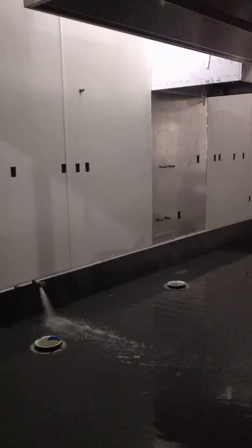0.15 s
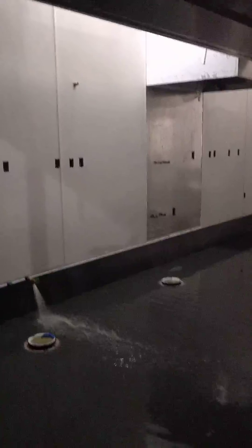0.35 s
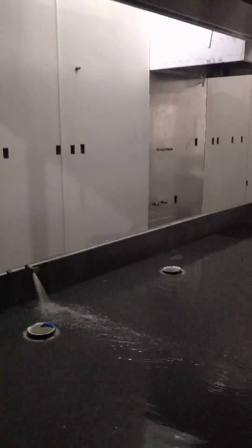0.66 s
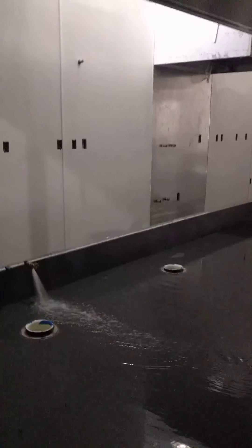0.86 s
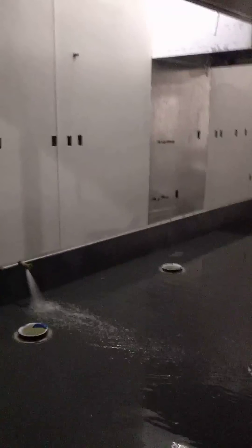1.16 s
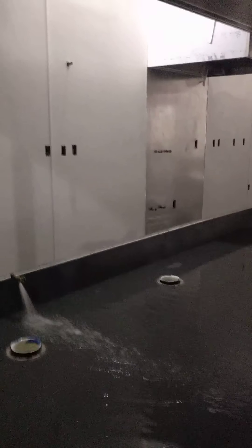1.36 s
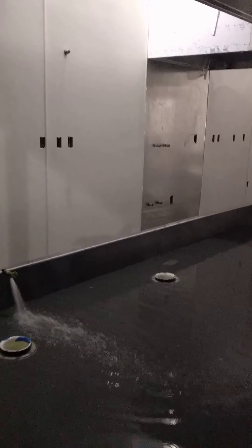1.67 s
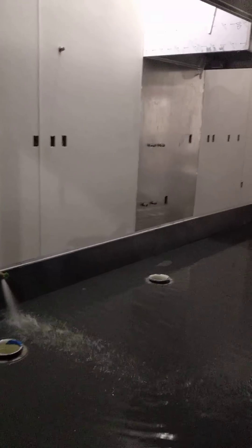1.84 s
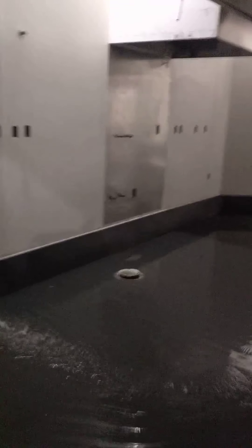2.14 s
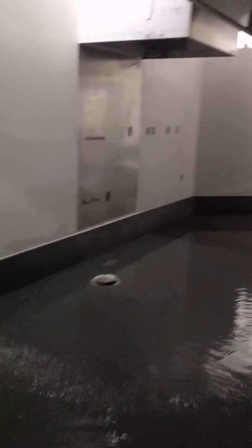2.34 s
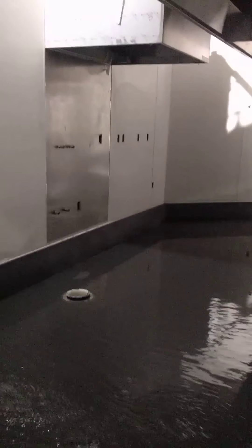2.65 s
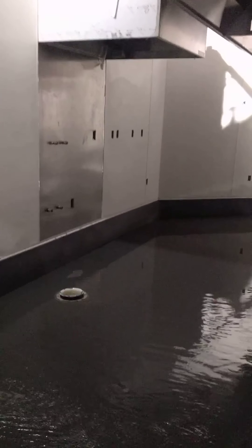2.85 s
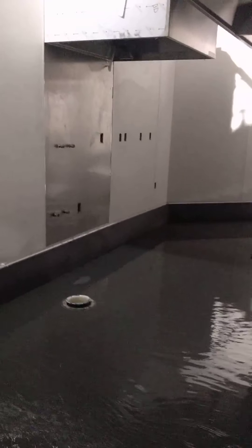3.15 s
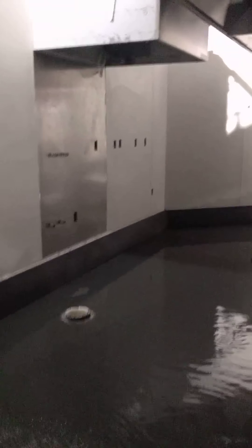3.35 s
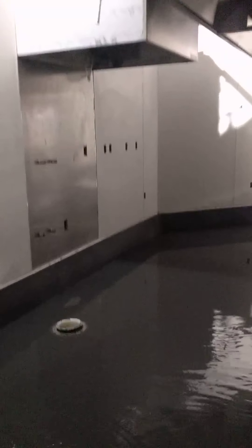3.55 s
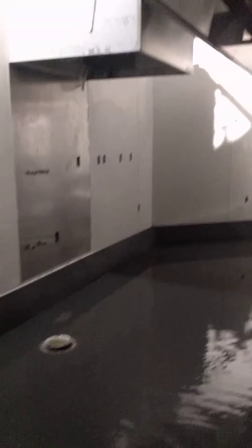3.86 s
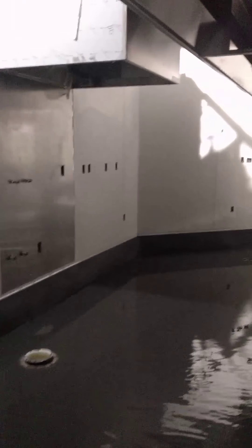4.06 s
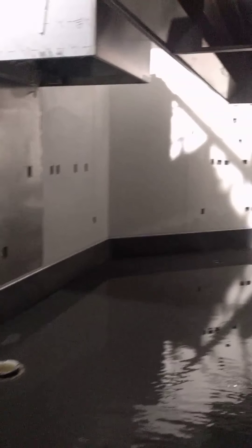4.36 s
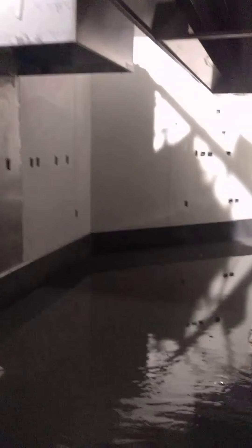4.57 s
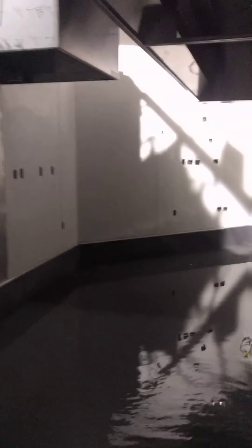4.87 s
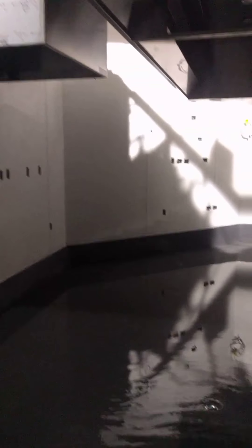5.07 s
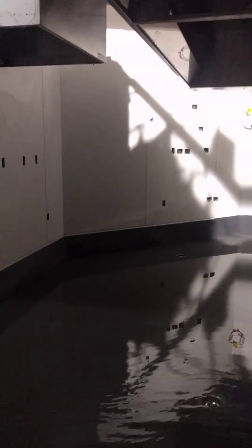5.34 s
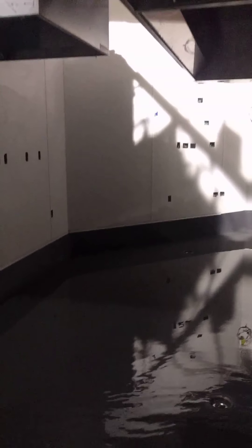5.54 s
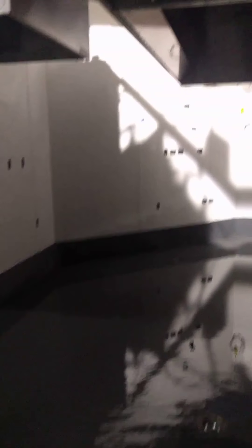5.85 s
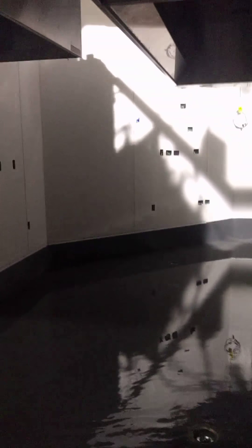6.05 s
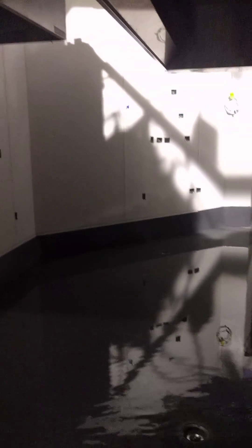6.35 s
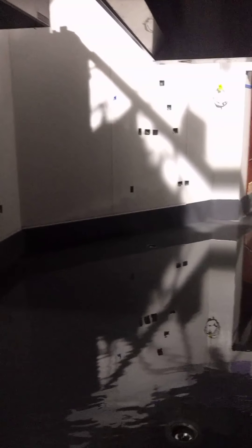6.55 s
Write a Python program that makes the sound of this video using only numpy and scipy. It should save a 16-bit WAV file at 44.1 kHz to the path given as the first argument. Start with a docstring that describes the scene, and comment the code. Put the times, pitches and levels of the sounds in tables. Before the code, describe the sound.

A continuous high hiss with a slight ring comes from a pipe spraying water onto a flooded kitchen floor. Beneath it are bubbling, sizzling droplets, a soft rumble where the jet lands and the low drone of the hard-walled room. Brief, light gulps pop up here and there. The microphone swings slowly away towards the far corner, so the spray gets brighter and the rumble fades, while the flow never stops.

```python
"""A bright, steady hiss: water jets from a pipe at the foot of a wall in a large, bare, flooded kitchen.
The nozzle rushes and rings, spray patters down, and the jet rumbles into the pool and churns up bubbles.
A few air pockets gulp. Hard walls blur the water, and the room drones low underneath.
The microphone swings slowly towards the far, steel-clad corner: the treble grows, the rumble recedes."""
import sys
import numpy as np
from scipy import signal
from scipy.fft import rfft, irfft
from scipy.io import wavfile
from scipy.ndimage import map_coordinates

SR = 44100
rng = np.random.default_rng(int(sys.argv[2]) if len(sys.argv) > 2 else 0)


def generate_wav(signal):
    """Clip the signal to [-1, 1] and save it as 16-bit WAV at the path in sys.argv[1]."""
    frames = np.transpose(np.atleast_2d(signal))
    scaled = np.clip(frames, -1, 1) * 32767
    pcm = np.round(scaled).astype(np.int16)
    wavfile.write(sys.argv[1], SR, pcm)


N = 295911


def undb(db):
    """Decibels to gain."""
    return 10 ** (np.asarray(db) / 20)


def unit(x):
    """Scale to rms 1."""
    return x / np.sqrt(np.mean(x ** 2))


def colour(x, spectrum):
    """Shape a sound by rows of (frequency_hz, relative_db), then scale it to rms 1."""
    hz, db = np.transpose(spectrum)
    bins_hz = np.maximum(np.fft.rfftfreq(2 * N, 1 / SR), 1)
    gain = undb(np.interp(np.log(bins_hz), np.log(hz), db))
    return unit(irfft(rfft(x, 2 * N) * gain)[:N])


def resonate(x, hz, width_hz):
    """One resonance, gain 1 at its centre."""
    return signal.lfilter(*signal.iirpeak(hz, hz / width_hz, fs=SR), x)


def wander(rate_hz):
    """A random drift of rms 1 that changes course about rate_hz times a second."""
    knots = rng.standard_normal(8192)
    return unit(map_coordinates(knots, [np.arange(N) / SR * rate_hz], order=1, mode="wrap"))


def impacts(count, spread_db):
    """Droplets click at random moments, many small and a few large."""
    when, chance, sign = rng.random((count, 3)).T
    size = undb(-spread_db * np.log(np.maximum(chance, .002)))
    return unit(np.bincount((when * N).astype(int), size * np.sign(sign - .5), N))


def bubble(hz, cycles, glide):
    """A trapped air bubble rings, fading to 1/e over cycles, and rises in pitch as it nears the surface."""
    age = np.arange(int(5 * cycles * SR / hz)) * hz / (SR * cycles)
    return np.exp(-age) * np.sin(2 * np.pi * cycles * age * (1 + glide * age / 2))


def add(out, at_s, sound):
    """Mix a short sound in at a given time."""
    start = int(np.clip(at_s * SR, 0, N - 1))
    out[start:start + len(sound)] += sound[:N - start]


def echoes(x, wet_db, t60_low_s, t60_high_s, changes):
    """Direct sound plus a dense echo whose pattern changes as microphone and water move."""
    t = np.arange(int(min(t60_low_s, 1) * SR * .7)) / SR
    low_decay, high_decay = (np.exp(-np.log(1000) * t / t60) for t60 in (t60_low_s, t60_high_s))
    lowpass = signal.butter(1, 3000, fs=SR)
    hop = N // changes + 1
    echo = np.zeros(N)
    for centre in range(0, N + hop, hop):
        span = np.arange(max(centre - hop, 0), min(centre + hop, N))
        piece = x[span] * np.cos(np.pi / 2 * (span - centre) / hop)
        noise = rng.standard_normal(len(t))
        low = signal.lfilter(*lowpass, noise)
        tail = (low * low_decay + (noise - low) * high_decay) * (t > .001)  # lags the direct sound
        add(echo, span[0] / SR, signal.fftconvolve(piece, tail / np.linalg.norm(tail)))
    wet = undb(wet_db)
    return (x + wet * echo) / np.hypot(1, wet)


def kitchen(x, wet_db):
    """The long echo of hard, bare walls; its treble dies first."""
    return echoes(x, wet_db, t60_low_s=0.82, t60_high_s=0.43, changes=14)


# The microphone's swing towards the far corner: time_s, share_of_turn (0 to 1)
MIC_TURN = [(0, 0.01), (1.9, 0.28), (2.6, 0.3), (3.2, 0.54), (5.0, 0.88), (6.71, 1)]
def mic_turn():
    """How far round the microphone has swung at each sample."""
    return np.interp(np.arange(N) / SR, *np.transpose(MIC_TURN))


def pickup(level_db, turn_db):
    """Gain of a source at the microphone: level_db, changing by turn_db over the whole turn."""
    return undb(level_db + turn_db * mic_turn())


# The air of the kitchen, all around the microphone: frequency_hz, relative_db
ROOM_SPECTRUM = [(15, -22), (32, -18), (47, 1), (62, 5), (90, -5), (130, -8), (180, -0.5), (240, -3),
                 (430, -6), (600, -17), (1200, -19.5)]
def room_tone():
    """The room drones low; the hollow ring of its steel-clad corner grows as the microphone turns."""
    drone = colour(rng.standard_normal(N), ROOM_SPECTRUM) * undb(-55.5)
    corner = unit(resonate(rng.standard_normal(N), hz=2135, width_hz=150))
    return drone + corner * pickup(level_db=-60, turn_db=17.4)


# The rumble at floor level, where the jet lands: frequency_hz, relative_db
PLUNGE_SPECTRUM = [(20, -15), (42, 4), (75, 0), (97, -5), (120, 1), (145, -2), (220, -1.5), (350, -4.5),
                   (600, -23), (1500, -36)]
def plunge():
    """The jet rumbles where it digs into the pool, fainter as the microphone turns away."""
    return colour(rng.standard_normal(N), PLUNGE_SPECTRUM) * pickup(level_db=-52.5, turn_db=-8)


# Air pockets that gulp now and then: start_s, pitch_hz, level_db, length_s
AIR_POCKETS = [(.95, 3630, -33, 0.076), (1.28, 1500, -45, .05), (2.52, 1143, -44, .12),
               (3.61, 4741, -29, .04), (5.23, 1580, -36, 0.13), (5.61, 1474, -38, .025),
               (5.61, 2450, -37, .06), (5.70, 2200, -34, .04), (6.22, 1895, -33, .08)]
def gulps(cycles, pitch_scatter, bubbles=6):
    """Now and then a pocket of air breaks into a few like-sized bubbles that echo in the room."""
    out = np.zeros(N)
    for start_s, pitch_hz, level_db, length_s in AIR_POCKETS:
        for k, detune in enumerate(rng.standard_normal(bubbles)):
            delay_s = length_s * (k + rng.random()) / bubbles
            hz = pitch_hz * (1 + pitch_scatter * detune)
            add(out, start_s + delay_s, undb(level_db) * bubble(hz, cycles, glide=0.0055))
    return kitchen(out, wet_db=-10)


# The bubble cloud in the pool under the jet: frequency_hz, relative_db
CHURN_SPECTRUM = [(150, -22), (380, -13), (600, -16.5), (780, -13), (950, -6), (1250, -5), (1520, -1),
                  (1850, 0.9), (2130, 0.2), (2450, -5.5), (2750, -8), (3500, -8), (6000, -35)]
def churn(ring_cycles, spread_db, surge_db, foam_db):
    """The jet drags air under: a cloud of ringing bubbles over the wash of foam."""
    cloud = np.zeros(N)
    for when, pitch, life, chance in rng.random((9000, 4)):
        hz = 500 * 8 ** pitch
        gain = undb(-spread_db * np.log(max(chance, .02)))
        cycles = 1 + ring_cycles * pitch * (.5 + life)  # large bubbles burst early, small ones ring on
        add(cloud, when * N / SR, gain * bubble(hz, cycles, glide=0.028))
    foam = undb(foam_db) * colour(rng.standard_normal(N), CHURN_SPECTRUM)
    wash = (colour(cloud, CHURN_SPECTRUM) + foam) * undb(surge_db * wander(14))
    return unit(kitchen(wash, wet_db=-9)) * pickup(level_db=-36.5, turn_db=-1.05)


# The finest spray on the pool, loudest with the microphone head-on: frequency_hz, relative_db
MIST_SPECTRUM = [(4000, -14.5), (8000, 3.5), (10300, 2), (11600, -3.5), (13500, -2.5), (16000, -4),
                 (17000, -4.5)]
def mist(off_axis_db, on_axis_boost_db):
    """Fine droplets patter on the pool; their sizzle swells as they come into the microphone's beam."""
    drops = impacts(count=40000, spread_db=3) + undb(1) * rng.standard_normal(N)
    beam_centre, beam_half_width = 0.81, 0.28  # shares of the turn
    in_beam = 1 / (1 + ((mic_turn() - beam_centre) / beam_half_width) ** 4)
    return colour(drops, MIST_SPECTRUM) * undb(off_axis_db + on_axis_boost_db * in_beam)


def nozzle_ring(hz, width_hz, drift, flutter_db):
    """The narrow opening rings near one pitch; pressure changes make its pitch and level waver."""
    ring = resonate(rng.standard_normal(N), hz, width_hz)
    ring = unit(resonate(ring, hz, width_hz))
    drifting_samples = np.arange(N) + np.cumsum(drift * wander(25))
    ring = map_coordinates(ring, [drifting_samples], order=3, mode="mirror")
    dip_at_s, dip_half_length_s, dip_db = 1, .07, -2.5  # the ring falters once, briefly
    dip = np.exp(-((np.arange(N) / SR - dip_at_s) / dip_half_length_s) ** 2)
    flutter = wander(70) + wander(9)
    return ring * pickup(level_db=-27, turn_db=2.8) * undb(dip_db * dip + flutter_db * flutter)


# The broad rush of the nozzle at the foot of the wall: frequency_hz, relative_db
RUSH_SPECTRUM = [(1500, -29.5), (2700, -21), (3300, -16), (4250, -11.5), (4650, -11.5), (5600, -10),
                 (6500, -7.5), (8400, -9), (9300, -14), (10500, -19.5), (12000, -21), (14000, -22),
                 (15200, -25), (17000, -26.5)]
def nozzle_rush():
    """Turbulence and countless tiny impacts hiss as the jet leaves the pipe."""
    spray = rng.standard_normal(N) + undb(-5) * impacts(count=40000, spread_db=2.5)
    return colour(spray, RUSH_SPECTRUM) * pickup(level_db=-28.5, turn_db=1.43)


def scene():
    """All the water and the room, from one slowly turning microphone."""
    jet = nozzle_rush() + nozzle_ring(hz=7150, width_hz=1280, drift=.006, flutter_db=0.25)
    spray = jet + mist(off_axis_db=-42.7, on_axis_boost_db=8.5)
    # the rippled pool and the near wall scatter the hiss and keep its colour shifting
    hiss = echoes(spray, wet_db=-11.5, t60_low_s=0.093, t60_high_s=0.073, changes=40)
    pool = churn(ring_cycles=13, spread_db=2, surge_db=0.13, foam_db=2.5)
    pool += gulps(cycles=22, pitch_scatter=0.027)
    return (hiss + pool + plunge() + room_tone())[None]


def record(dry):
    """The recorder cuts the bass below 41 Hz and the treble above 17 kHz."""
    low_cut = signal.butter(5, 41, "high", fs=SR, output="sos")
    high_cut = signal.ellip(12, .1, 80, 17000, fs=SR, output="sos")
    return signal.sosfilt(high_cut, signal.sosfilt(low_cut, dry))


dry = scene()
out = record(dry)
generate_wav(out)
```